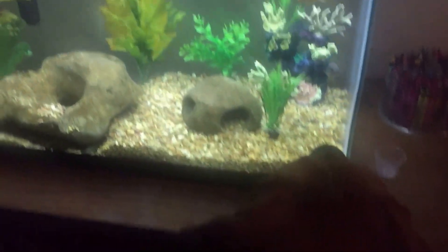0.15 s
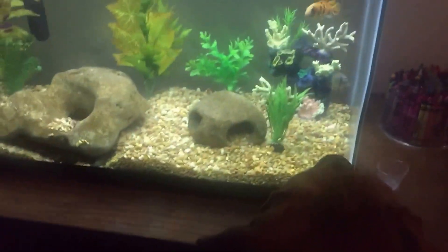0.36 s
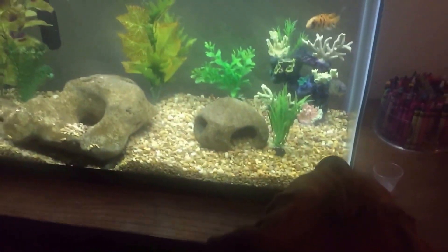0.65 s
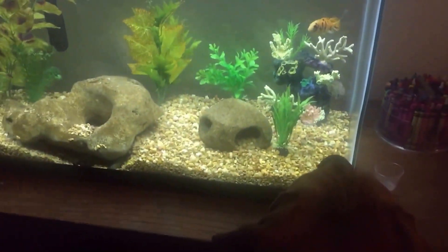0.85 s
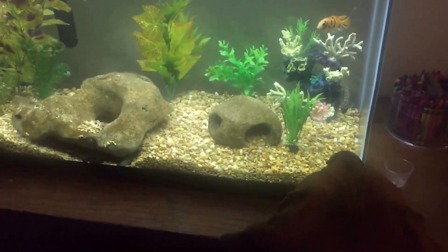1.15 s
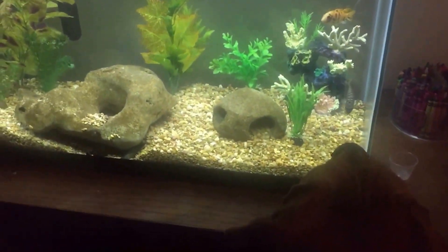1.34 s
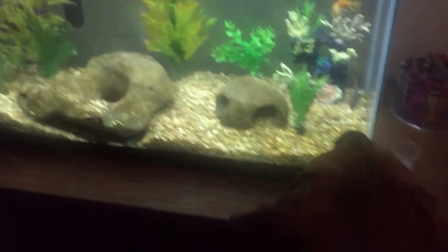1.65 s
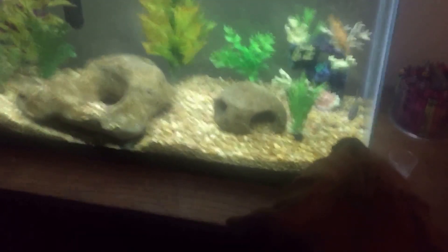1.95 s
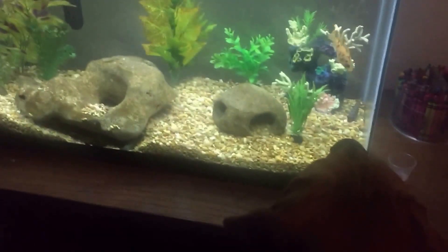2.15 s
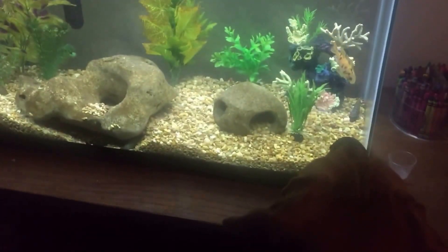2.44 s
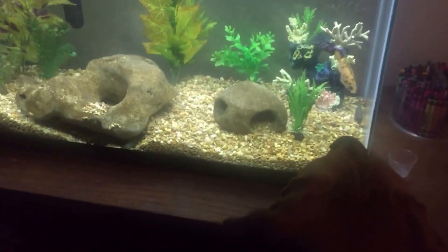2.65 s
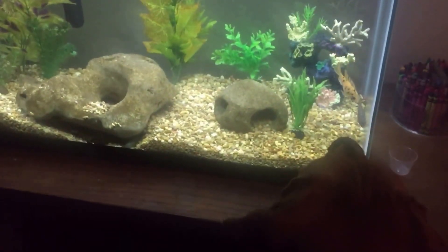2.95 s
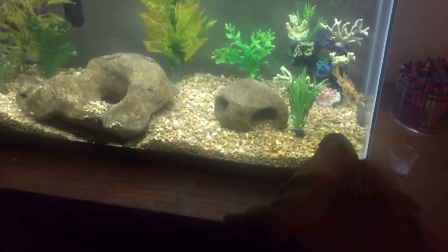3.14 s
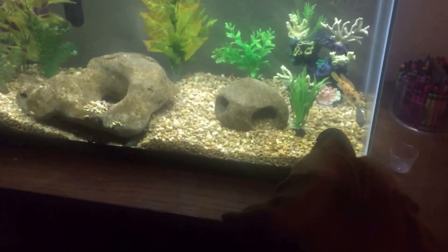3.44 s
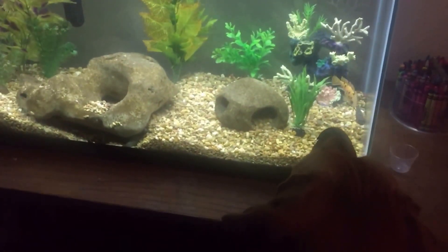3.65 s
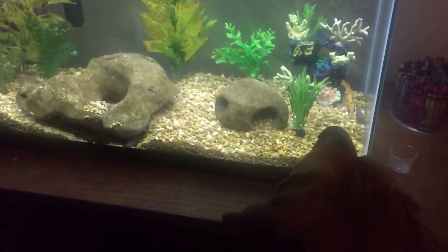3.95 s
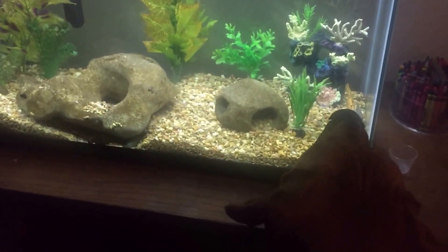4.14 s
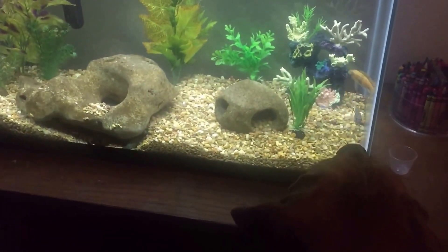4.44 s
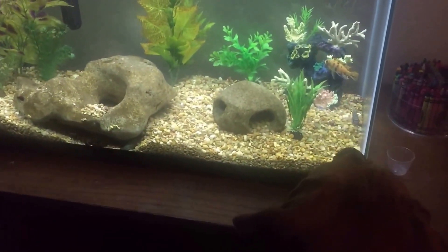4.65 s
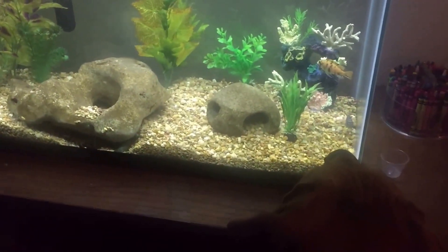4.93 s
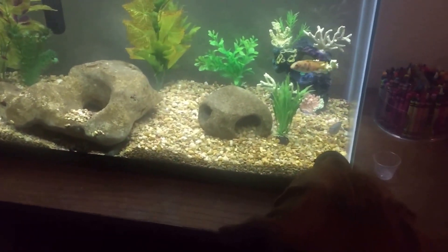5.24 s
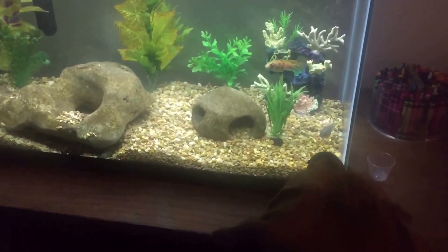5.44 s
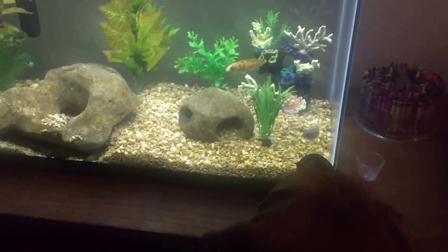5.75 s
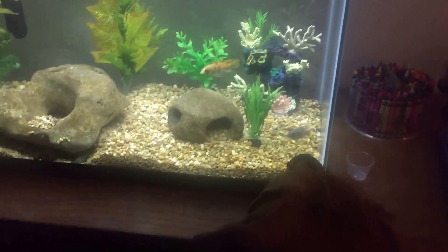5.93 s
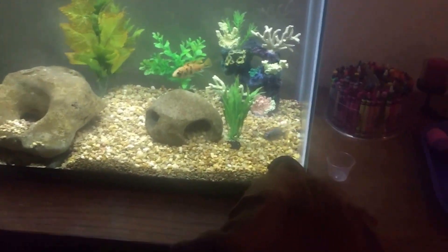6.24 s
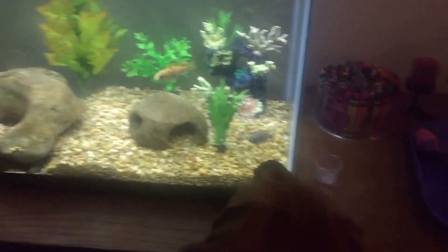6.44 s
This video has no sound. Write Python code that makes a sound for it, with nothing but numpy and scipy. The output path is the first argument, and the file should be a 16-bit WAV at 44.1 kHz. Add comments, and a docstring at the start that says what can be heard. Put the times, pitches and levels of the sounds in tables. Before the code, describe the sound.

An aquarium filter hums and rattles steadily in a quiet room while water trickles, plinks and bubbles, with two soft close knocks.

```python
"""An aquarium filter in a quiet room. From the start its pump hums and whines on the mains, the impeller
rattles and clacks in the housing, and churning water rumbles over a soft wash and hiss. The outflow
plinks with ringing bubbles and ticks with noisy droplets, among short blurred swells. In the first second
the lid's extra buzz settles while the housing gains. Near 2.1 s and 3.8 s something knocks softly close by,
with click, ring, shudder and thump, and each time the rumble and the low hum sag for a moment."""
import sys
import numpy as np
from scipy import signal
from scipy.fft import rfft, irfft, next_fast_len
from scipy.io import wavfile
from scipy.ndimage import uniform_filter1d, map_coordinates

SR = 44100
rng = np.random.default_rng(int(sys.argv[2]) if len(sys.argv) > 2 else 0)


def int16_out(signal):
    """Quantize to a 16-bit WAV file."""
    q = np.round(np.clip(np.atleast_2d(signal).T, -1, 1) * 32767)
    wavfile.write(sys.argv[1], SR, q.astype(np.int16))


N = 290619  # length in samples


def amp(db):
    """Decibels to gain."""
    return 10 ** (np.asarray(db) / 20)


def unit(x):
    """Scale to rms 1."""
    return x / np.sqrt(np.mean(x ** 2) + 1e-20)


def along(points, hz):
    """Read (f/Hz, value) points on a log frequency axis."""
    f, v = np.transpose(points)
    return np.interp(np.log(hz + 1), np.log(f + 1), v)


def filtered(x, response):
    """Shape x with a response given as a function of frequency."""
    m = next_fast_len(N + SR // 2)
    return irfft(rfft(x, m) * response(np.fft.rfftfreq(m, 1 / SR)), m)[:N]


def coloured(x, spectrum):
    """Shape x with a (f/Hz, level/dB) spectrum, at rms 1."""
    return unit(filtered(x, lambda hz: amp(along(spectrum, hz))))


def bandpassed(x, edges):
    """Keep the band between two edges in Hz."""
    return signal.sosfilt(signal.butter(2, edges, "bandpass", fs=SR, output="sos"), x)


def add(track, s, sound):
    """Mix a sound into the track at time s."""
    part = track[max(round(s * SR), 0):][:len(sound)]
    part += sound[:len(part)]


def wobble(per_s):
    """A smooth random curve of spread about 1, with so many knots a second."""
    knots = rng.standard_normal(1024)
    return map_coordinates(knots, [np.arange(N) * per_s / SR], mode="wrap")


def bumps(rows, half_s):
    """A dB curve with one smooth rise or dip for each (t/s, level/dB) row."""
    t = np.arange(N) / SR
    return sum(db * np.exp(-np.minimum(((t - s) / half_s) ** 2, 50)) for s, db in rows)


def resonance(f, hz, width):
    """Response of one mode, 1 at its centre."""
    return 1j * f * width / (hz * hz - f * f + 1j * f * width)


# wash of running water: f/Hz, level/dB (relative density)
WASH_SPECTRUM = [(20, -53), (60, 10), (450, -4.5), (780, -3.5), (1200, -6.5), (1750, -9.5), (2600, -23.5),
                 (4000, -60)]
# room and microphone hiss: f/Hz, level/dB (relative density)
HISS_SPECTRUM = [(1060, -25), (1800, -6.5), (2340, -3.5), (2560, -3), (4490, -5), (4910, -9), (5580, -5),
                 (6600, -6), (7600, -10.5), (8900, -8), (9800, -10), (10450, -17), (10900, -11.5),
                 (13000, -12), (14350, -12), (14700, -25), (15050, -8), (15300, -17), (15750, -9.5)]


def background():
    """A soft wash of running water and an even hiss, both steady noise shaped by a spectrum."""
    wash = amp(-66.5) * coloured(rng.standard_normal(N), WASH_SPECTRUM)
    hiss = amp(-73.5) * coloured(rng.standard_normal(N), HISS_SPECTRUM)
    return wash + hiss


# the knocks: t/s, ring level/dB, click level/dB, thump level/dB, sag of the bass level/dB
KNOCKS = [(2.068, -42.5, -47, -30, -12), (3.824, -42, -54, -45, -7.5)]
# modes the knocks ring with: f/Hz, level/dB (relative), t60/s
CASE_MODES = [(372, -13, 0.037), (460, -23, 0.03), (620, -2, 0.03), (730, -10, 0.028), (940, 7, 0.021),
              (1280, 2, 0.012), (1650, -7, 0.014)]
THUMP_HZ = 57.4  # where the thump's pitch settles
# shudder: level against the ring, decay time, band
JOLT_DB, JOLT_T60, JOLT_LOW_HZ, JOLT_HIGH_HZ = -9.5, 0.071, 150, 620


def knocks():
    """A close, dry tap: a click, a few short modes, a shudder and a low thump that sinks in pitch."""
    out, t = np.zeros(N), np.arange(SR // 6) / SR
    for s, ring_db, click_db, thump_db, _ in KNOCKS:
        ring = np.zeros(len(t))
        for hz, db, t60 in CASE_MODES:
            ring += amp(db - 60 * t / t60) * np.sin(2 * np.pi * (hz * t + rng.random()))
        soft_onset = 1 - np.exp(-t / 0.0013)
        add(out, s, amp(ring_db) * ring * soft_onset)

        click = bandpassed(rng.standard_normal(len(t)), [1500, 6500])
        add(out, s, amp(click_db - 60 * t / 0.02) * click)

        shudder = unit(bandpassed(rng.standard_normal(len(t)), [JOLT_LOW_HZ, JOLT_HIGH_HZ]))
        add(out, s, amp(ring_db + JOLT_DB - 60 * t / JOLT_T60) * shudder)

        pitch = THUMP_HZ * (1 + 1.63 * np.exp(-t / 0.011))
        swell = (t / 0.015) * np.exp(1 - t / 0.0072)
        add(out, s, amp(thump_db) * swell * np.sin(2 * np.pi * np.cumsum(pitch) / SR))
    return out


SAG_FALL_S, SAG_HOLD_S, SAG_RETURN_S = 0.008, 0.14, 0.21


def sag():
    """Gain of the bass: at each knock it falls quickly, stays low, then returns."""
    t = np.arange(N) / SR
    corners = np.cumsum([0, SAG_FALL_S, SAG_HOLD_S, SAG_RETURN_S])
    return amp(sum(db * np.interp(t - s, corners, [0, 1, 1, 0]) for s, *_, db in KNOCKS))


# decay of the room's tail: f/Hz, t60/s
ROOM_DECAY = [(200, 0.043), (2000, 0.12), (6000, 0.16), (14000, 0.0043)]
# echoes between water, glass and hood, and the room's tail: levels against the direct sound
GLASS_DB, GLASS_T60, ROOM_DB = 0, 0.044, -3


def echoed(sound):
    """Add fresh random quick echoes between glass and hood, and the room's tail."""
    t = np.arange(SR // 4) / SR
    glass = rng.standard_normal(len(t)) * amp(-60 * t / GLASS_T60)
    hz, s, z = signal.stft(rng.standard_normal(len(t)), SR, nperseg=256)
    decay = amp(-60 * s / along(ROOM_DECAY, hz)[:, None])
    tail = signal.istft(z * decay, SR, nperseg=256)[1][:len(t)]
    path = amp(GLASS_DB) * glass / np.linalg.norm(glass)
    path += amp(ROOM_DB) * tail / np.linalg.norm(tail)
    path[0] += 1  # direct sound
    return signal.fftconvolve(sound, path)


# how hard the outflow runs: t/s, level/dB
FLOW = [(0, -2), (.7, -2.5), (1.3, 0), (2.2, -.5), (3.2, 2), (4.05, -3), (4.4, 1), (5.1, 1.5), (6.59, 0)]
SPURT_DB, SPURTS_PER_S = 1.4, 9  # swing and pace of the outflow's spurts
STIR_DB, STIR_S = 66, 0.05  # faint bubbles stirred up by a clear one: gain on its level, decay


def outflow():
    """Share 0-1 of all splashing done by each moment; it quickens in spurts and after each clear bubble."""
    t = np.arange(N) / SR
    stir = np.zeros(N)
    for s, _, db in CLEAR_BUBBLES:
        stir += amp(2 * (db + STIR_DB)) * (t > s) * np.exp(-np.abs(t - s) / STIR_S)
    flow_s, flow_db = np.transpose(FLOW)
    level_db = np.interp(t, flow_s, flow_db) + SPURT_DB * wobble(SPURTS_PER_S)
    busy = np.cumsum(amp(2 * level_db) + stir)
    return busy / busy[-1]


LEVEL_SPREAD_DB = 0.5  # of the chance events


def scattered(progress, low_hz, high_hz, db, count):
    """Chance events that follow the outflow, as rows t/s, f/Hz, level/dB."""
    when, size = rng.random((count, 2)).T
    times = np.searchsorted(progress, (np.arange(count) + when) / count) / SR
    levels = db + LEVEL_SPREAD_DB * rng.standard_normal(count)
    return list(zip(times, low_hz * (high_hz / low_hz) ** size, levels))


def plink(hz, cycles, rise):
    """A trapped bubble rings for some cycles; its pitch climbs as it nears the surface. Energy 1."""
    t = np.arange(SR // 20) / SR
    age = t * hz / cycles  # down 60 dB at age 1
    pitch = hz * (1 + rise * (np.minimum(age, 1) - 0.15))
    ring = np.sin(2 * np.pi * np.cumsum(pitch) / SR) * amp(-60 * age) * (1 - np.exp(-t * hz))
    return ring / np.linalg.norm(ring)


def patter(times):
    """Faint bubbles at one spot on the water; the smaller, the higher and weaker."""
    out = np.zeros(N)
    for s, (smallness, weakness) in zip(times, rng.random((len(times), 2))):
        hz = 2100 * 5.81 ** smallness ** 1.2
        add(out, s, amp(-8 * smallness - 16.3 * weakness) * plink(hz, cycles=75, rise=0.48))
    return unit(echoed(out)[:N])


TRICKLE_DB = -79.5  # rms of all the faint bubbles


def trickle(progress, count=4, size=420):
    """The outflow lands on several spots at once, each with its own patter and echoes."""
    spots = np.searchsorted(progress, rng.random((count, size))) / SR
    return amp(TRICKLE_DB) * unit(sum(patter(times) for times in spots))


# short blurred swells, gulps of air or buzzes of the lid: t/s, f/Hz (start), level/dB (relative)
BLURRED_SWELLS = [(.076, 1420, -69.5), (.096, 1350, -66.5), (0.506, 1353, -67.5), (1.041, 1410, -74),
                  (2.366, 1017, -68), (2.385, 1130, -71), (2.407, 1265, -72), (4.035, 1465, -74),
                  (5.428, 1384, -75)]
WAVER, WAVERS_PER_S = 0.07, 260  # pitch swing as a share, and its pace


def blurred_swells():
    """A short tone swells and fades; its slowly rising pitch is blurred by a fast random waver."""
    out, t = np.zeros(N), np.arange(SR // 8) / SR
    swell = (t / 0.005) ** 2 * np.exp(2 * (1 - t / 0.01))
    for s, hz, db in BLURRED_SWELLS:
        pitch = hz * (1 + 3.44 * t + WAVER * wobble(WAVERS_PER_S)[:len(t)])
        tone = swell * np.sin(2 * np.pi * np.cumsum(pitch) / SR)
        add(out, s, amp(db - 3.5) * echoed(tone))
    return out


# the sharpest droplets: t/s, level/dB (relative), f/Hz (centre), spread/octaves (each way)
SHARP_DROPLETS = [(0.4226, -48.5, 8600, 0.12), (.75, -55.5, 11400, 0.2), (.847, -63, 12200, .2),
                  (1.095, -61, 9400, .2), (1.183, -51.5, 6800, 0.19), (1.533, -55.5, 10050, 0.38),
                  (1.693, -52, 5760, 0.74), (1.796, -59, 9400, .15), (1.822, -50.5, 3740, 0.55),
                  (2.209, -61, 9550, .5), (2.321, -52.5, 8940, 0.074), (2.447, -49, 5070, 0.59),
                  (2.562, -61, 8140, .1), (2.626, -57, 8500, 0.11), (2.691, -63, 10000, .6),
                  (2.871, -49.5, 6140, 0.16), (3.069, -60, 10500, .55), (3.087, -51.5, 5040, .92),
                  (3.161, -61, 9500, .6), (3.289, -58, 10300, 0.23), (3.537, -60, 8950, 0.17),
                  (4.365, -53.5, 5970, 0.5), (4.452, -55, 3400, .5), (4.529, -61, 9250, .2),
                  (4.754, -59, 7000, .7), (5.041, -55, 3440, 0.86), (5.064, -61, 13000, .12),
                  (5.22, -58, 8240, .55), (5.41, -64, 12400, 0.12), (5.531, -53, 4500, 1.1),
                  (5.763, -46, 9000, 0.27), (6.12, -59, 10700, .3), (6.134, -60, 9600, 0.28),
                  (6.382, -61, 11860, .25), (6.516, -56, 9500, .22)]
# fine droplets: relative level, pitch range, spread each way
SPRAY_DB, SPRAY_LOW_HZ, SPRAY_HIGH_HZ, SPRAY_OCTAVES = -63, 9000, 14500, 0.49
SLAP_T60, CRACK_DB = 0.013, -3  # slap's decay (s); its broadband part against the ring
SPLASH_DB, SPLASH_T60 = 2, 0.11  # fizz: level against the slap, decay (s)


def droplets(progress):
    """A falling drop hits the surface with a sharp noise tick and throws up a grainy fizz."""
    out, t = np.zeros(N), np.arange(SR // 10) / SR
    fine = scattered(progress, SPRAY_LOW_HZ, SPRAY_HIGH_HZ, SPRAY_DB, count=10)
    spray = [(s, db, hz, SPRAY_OCTAVES) for s, hz, db in fine]
    for s, db, hz, spread in [*SHARP_DROPLETS, *spray]:
        edges = np.clip([hz / 2 ** spread, hz * 2 ** spread], 100, SR / 2 - 100)
        slap = unit(rng.standard_normal(len(t)) * amp(-60 * t / SLAP_T60))
        # cubed noise is sparse and grainy
        fizz = unit(rng.standard_normal(len(t)) ** 3 * amp(-60 * t / SPLASH_T60))
        ring = bandpassed(slap + amp(SPLASH_DB) * fizz, edges)
        tick = echoed(unit(ring) + amp(CRACK_DB) * slap)
        add(out, s, amp(db + 13.5) * tick / np.linalg.norm(tick))
    return out


# the clearest bubbles that ring at the surface: t/s, f/Hz, level/dB (relative)
CLEAR_BUBBLES = [(0.121, 5500, -73), (0.188, 2680, -72), (0.304, 3270, -72.5), (0.369, 1883, -62.5),
                 (0.52, 1820, -67.5), (0.939, 2910, -68.5), (0.964, 3530, -71.5), (.984, 6520, -70.5),
                 (1.108, 2470, -71.5), (1.182, 5800, -67), (1.297, 2930, -69.5), (1.32, 4530, -68),
                 (1.359, 5560, -67), (1.376, 5300, -68), (1.412, 6400, -73), (1.513, 5880, -69.5),
                 (1.57, 6260, -68.5), (1.7, 2410, -68.5), (1.76, 2140, -69.5), (1.824, 3110, -66.5),
                 (1.83, 4070, -70), (1.846, 3100, -69), (1.855, 6650, -72.5), (1.959, 5520, -70.5),
                 (2.131, 3810, -67.5), (2.209, 5500, -64.5), (2.226, 4500, -71), (2.421, 5530, -69),
                 (2.324, 3170, -69.5), (2.387, 5100, -66), (2.45, 2310, -62), (2.495, 2340, -67),
                 (2.599, 2124, -65), (2.691, 5360, -71), (2.762, 4950, -68), (2.792, 6650, -72),
                 (2.832, 2680, -71), (2.869, 2254, -61), (2.906, 3120, -67), (2.922, 3140, -70),
                 (2.943, 5970, -71.5), (2.944, 3110, -71), (3.009, 3700, -71.5), (3.046, 2110, -68),
                 (3.07, 6840, -70.5), (3.092, 3240, -64.5), (3.111, 3200, -67), (3.161, 4140, -64.5),
                 (3.299, 2600, -70.5), (3.345, 2044, -66), (3.205, 3480, -72), (3.278, 5400, -72.5),
                 (3.406, 5140, -71.5), (3.429, 2830, -68), (3.46, 6360, -67.5), (3.546, 1830, -70),
                 (3.565, 4460, -69), (3.632, 2130, -67), (3.694, 5370, -68), (3.904, 4180, -66.5),
                 (3.933, 5540, -70), (3.939, 3350, -73), (3.957, 3730, -67.5), (4.172, 4110, -73),
                 (4.184, 5380, -71), (4.217, 4780, -72), (4.302, 4560, -70), (4.369, 2060, -65.5),
                 (4.42, 3840, -70.5), (4.454, 2400, -68), (4.457, 3800, -70), (4.535, 2054, -64),
                 (4.671, 1800, -66.5), (4.754, 5450, -70), (4.833, 6800, -73), (4.888, 6200, -73),
                 (4.978, 5470, -71), (5.044, 1956, -64), (5.053, 2750, -69.5), (5.089, 5390, -68.5),
                 (5.157, 2600, -71), (5.162, 4620, -72), (5.232, 4500, -72), (5.297, 3830, -72),
                 (5.41, 5900, -69), (5.532, 2810, -64.5), (5.533, 2020, -60.5), (5.58, 4230, -72),
                 (5.668, 4540, -71), (5.722, 4600, -66.5), (5.766, 3030, -64.5), (6.027, 2740, -68),
                 (6.057, 4300, -65.5), (6.081, 2960, -68.5), (6.229, 1770, -66.5), (6.369, 4370, -70.5),
                 (6.387, 3520, -71), (6.508, 4080, -70.5), (6.515, 2440, -69), (6.532, 6240, -69.5)]
# middling bubbles between the clear ones: relative level, pitch range
STRAY_DB, STRAY_LOW_HZ, STRAY_HIGH_HZ = -78.5, 2770, 6500


def bubbles(progress, count=4):
    """Each clear or middling bubble breaks off with a spray of weaker ones of about its size."""
    out = np.zeros(N)
    strays = scattered(progress, STRAY_LOW_HZ, STRAY_HIGH_HZ, STRAY_DB, count=20)
    for s, hz, db in [*CLEAR_BUBBLES, *strays]:
        burst = np.zeros(SR // 8)
        add(burst, 0, plink(hz, cycles=140, rise=0.14))
        for delay, size in rng.random((count, 2)):
            small = plink(hz * 2 ** (0.386 * size - 0.15), cycles=79, rise=0.2)
            add(burst, 0.055 * delay ** 2, amp(-5.5 - 14.6 * delay) * small)
        burst = echoed(burst)
        add(out, s, amp(db + 28.5) * burst / np.linalg.norm(burst))
    return out


# resonances of the air under the hood: f/Hz, width/Hz, level/dB (against the direct splash)
HOOD_MODES = [(1958, 31, -5), (2080, 25, -7.5), (2280, 16, 6), (2737, 17, 3.5), (2980, 19, -0.5),
              (3250, 10, 0)]
GLINT_HZ, GLINT_WIDTH_HZ, GLINT_DB = 5710, 120, -3  # a bright resonance over the water


def under_hood(water):
    """Every splash also rings the air under the hood."""
    cavity = [*HOOD_MODES, (GLINT_HZ, GLINT_WIDTH_HZ, GLINT_DB)]
    return filtered(water, lambda f: 1 + sum(amp(db) * resonance(f, hz, w) for hz, w, db in cavity))


# resonances of tank and stand: f/Hz, width/Hz (each way, to half amplitude), level/dB (relative)
TANK_MODES = [(63.1, 7.6, -3.5), (112.5, 13.2, -2.5), (122.5, 5.1, 3.5), (141.5, 5.8, 2), (178, 31, -7),
              (198, 23, -8.5), (252, 19, -12.5), (321.9, 25.8, -13), (366, 17, -18.5), (428, 11, -22)]
# brief rises and dips of the rumble's level: t/s, level/dB (relative)
RUMBLE_BUMPS = [(.207, -4), (.251, 3), (.334, -0.5), (.455, -5.5), (.548, 1.5), (.747, 5.5), (1.01, 4.5),
                (1.288, 5), (1.486, -5), (2.05, -3), (2.215, 8.5), (2.599, 3.5), (2.958, -4), (3.182, 3),
                (3.315, 4), (3.445, -4.5), (3.786, 1), (3.87, -4), (4.183, 5), (4.32, 2), (4.378, -4),
                (4.539, 2), (4.584, -3.5), (4.692, -6.5), (5.253, 0), (5.409, 2), (5.844, -7.5), (6.006, 6),
                (6.144, -6), (6.414, 2)]
RUMBLE_BUMP_S = 0.026  # half the length of a rise or dip
RUMBLE_DB, SURGE_DB, SURGES_PER_S = -49.5, 1.08, 26  # base gain; swing and pace of the surges


def churn():
    """Turbulent flow shakes the low resonances of tank and stand in quick, uneven surges."""
    def modes(f):
        return np.sqrt(sum(amp(2 * db) / (1 + ((f - hz) / w) ** 2) ** 2 for hz, w, db in TANK_MODES))

    rumble = unit(filtered(rng.standard_normal(N), modes))
    # the rumble's loudness is partly evened out over a ninth of a second
    power = np.abs(uniform_filter1d(rumble ** 2, size=SR // 9))
    evened = rumble / np.sqrt(power + 0.13)
    level_db = RUMBLE_DB + bumps(RUMBLE_BUMPS, RUMBLE_BUMP_S) + SURGE_DB * wobble(SURGES_PER_S)
    return sag() * amp(level_db) * evened


MAINS_HZ = 60
# low mains lines of the pump: multiple of the mains, level/dB (rms, before the sag)
HUM_LINES = [(1, -73.5), (2, -63), (3, -67.5), (4, -79), (5, -77.5), (6, -78.5)]
# high mains lines of the pump: multiple of the mains, level/dB (rms)
WHINE_LINES = [(10, -89.5), (16, -71.5), (22, -93)]


def motor():
    """The motor hums on multiples of the mains; the low hum sags with the rumble, the whine holds."""
    turns = MAINS_HZ * np.arange(N) / SR

    def line(k, db):
        return amp(db) * np.sqrt(2) * np.sin(2 * np.pi * (k * turns + rng.random()))

    return sag() * sum(line(k, db) for k, db in HUM_LINES) + sum(line(k, db) for k, db in WHINE_LINES)


# colour of the filter housing: f/Hz, level/dB (relative density)
HOUSING_SPECTRUM = [(740, -47), (812, -22), (842, -2), (862, -8.5), (895, 2.5), (930, -0.5), (985, 1),
                    (1010, -1.5), (1035, -4), (1080, -3), (1120, -24.5), (1200, -48.5)]
# colour of the lid: f/Hz, level/dB (relative density)
LID_SPECTRUM = [(1120, -18.5), (1220, -3), (1258, -4), (1292, 0), (1350, -9.5), (1410, 7), (1440, -3.5),
                (1485, 5), (1555, -6), (1585, -3.5), (1622, 4), (1680, -34), (1800, -33)]
# single clacks of the impeller: t/s, level/dB (against the usual rattle)
CLACKS = [(.083, 9), (0.165, 15.5), (.701, 7), (.761, 12), (1.184, 7), (1.339, 10), (2.095, 12), (2.3, 4.5),
          (2.551, -4), (2.777, 15), (3.157, 11.5), (3.281, 9.5), (3.602, 7), (3.725, 6), (3.871, 10),
          (3.894, 11), (3.95, 11), (4.251, 9.5), (4.292, 10), (4.345, 8.5), (4.576, 11), (4.816, 11.5),
          (5.276, 6), (5.411, 5), (5.509, 10.5), (6.25, 4)]
# the rattle eases or swells as air passes the impeller: t/s, level/dB (against the usual rattle)
RATTLE_SWELLS = [(.009, 2.5), (.11, 3.5), (.236, -4), (.29, 3.5), (.347, -20), (.46, 1.5), (.556, -5.5),
                 (.661, -2), (.703, 5.5), (.873, -5), (1.142, -6.5), (1.278, 1.5), (1.556, -7.5),
                 (1.682, 5), (1.809, -6), (1.943, -3.5), (2.238, -12), (2.452, -9), (2.856, -6), (2.963, 5),
                 (3.386, -4.5), (3.569, -4.5), (3.618, 2.5), (4.256, 1), (4.426, -2), (4.864, -2),
                 (5.425, 4.5), (5.674, -6), (5.787, -3), (6.045, -6), (6.124, 2.5), (6.28, -4.5)]
SWELL_S = 0.021  # half the length of a swell
CLACK_DB = 21  # the impulse that rings the housing as loudly as the usual rattle
SLIP_DB, SLIP_LEAD_S, SLIP_S = -3.5, 0.014, 0.006  # slip before a clack: drop, lead, half length
WANDER_DB, WANDERS_PER_S, STRIKE_SCATTER_DB = 0.95, 22, 1.18  # drift of the force; spread of strikes
HOUSING_DB, LID_DB = -57, -70  # the rattle once it has settled
HOUSING_START_DB, LID_START_DB, SETTLE_S = -5.5, 4.5, 0.96  # offsets at the start, fading to 0


def rattle():
    """The loose impeller strikes its housing twice a mains cycle, slipping free before each clack."""
    t = np.arange(N) / SR
    stroke = 2 * MAINS_HZ * t
    strikes = amp(STRIKE_SCATTER_DB * rng.standard_normal(int(stroke[-1]) + 1))
    force = strikes[stroke.astype(int)]
    slips = bumps([(s - SLIP_LEAD_S, SLIP_DB) for s, _ in CLACKS], SLIP_S)
    drift = amp(bumps(RATTLE_SWELLS, SWELL_S) + slips + WANDER_DB * wobble(WANDERS_PER_S))
    contact = force * drift * (0.5 + np.exp(-(stroke % 1) / 0.12))  # each strike fades over its stroke
    blows = unit(contact * rng.standard_normal(N))
    for s, db in CLACKS:
        add(blows, s, amp([CLACK_DB + db]))  # one-sample impulse
    buzz = contact * rng.standard_normal(N)
    unsettled = np.maximum(1 - t / SETTLE_S, 0)
    housing = amp(HOUSING_DB + HOUSING_START_DB * unsettled) * coloured(blows, HOUSING_SPECTRUM)
    lid = amp(LID_DB + LID_START_DB * unsettled) * coloured(buzz, LID_SPECTRUM)
    return housing + lid


def pump():
    """The mains motor and the rattle of its loose impeller."""
    return motor() + rattle()


def scene():
    """Pump and water, heard from in front of the tank."""
    progress = outflow()
    water = trickle(progress) + blurred_swells() + droplets(progress) + bubbles(progress)
    return (background() + knocks() + under_hood(water) + churn() + pump())[None]


TOP_HZ = 15780  # upper band limit


def record(dry):
    """Keep nothing above the band limit."""
    return np.array([filtered(channel, lambda hz: hz < TOP_HZ) for channel in dry])


dry = scene()
out = record(dry)
int16_out(out)
```